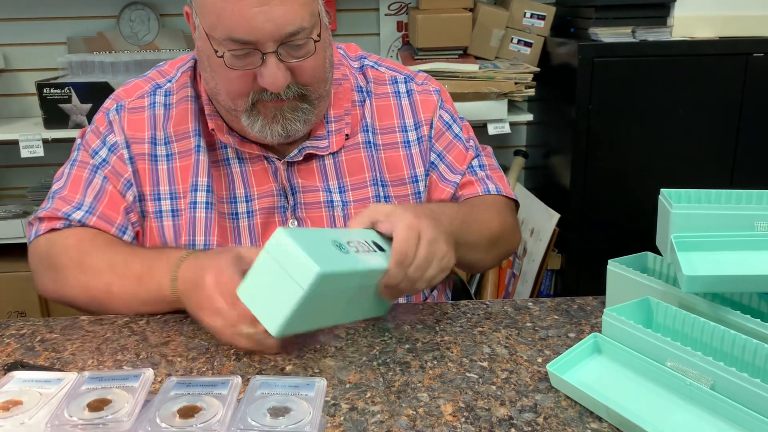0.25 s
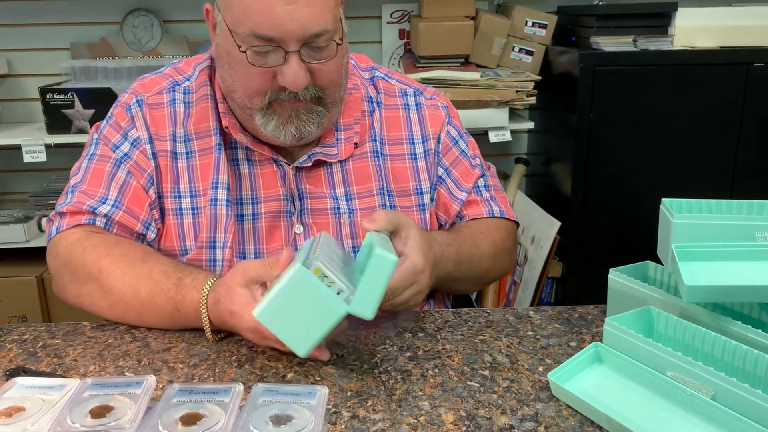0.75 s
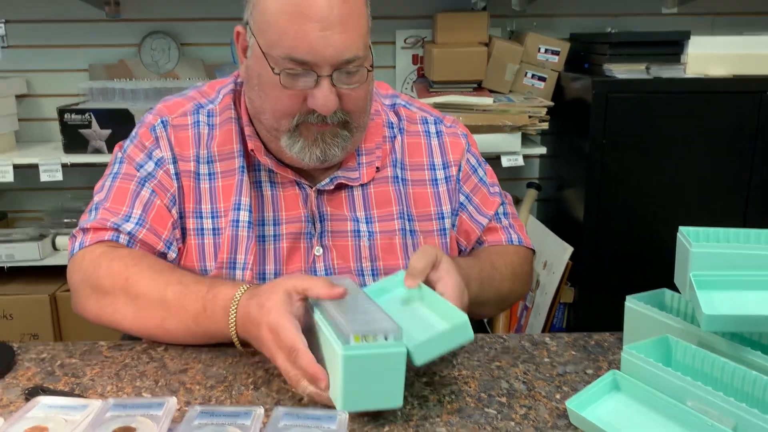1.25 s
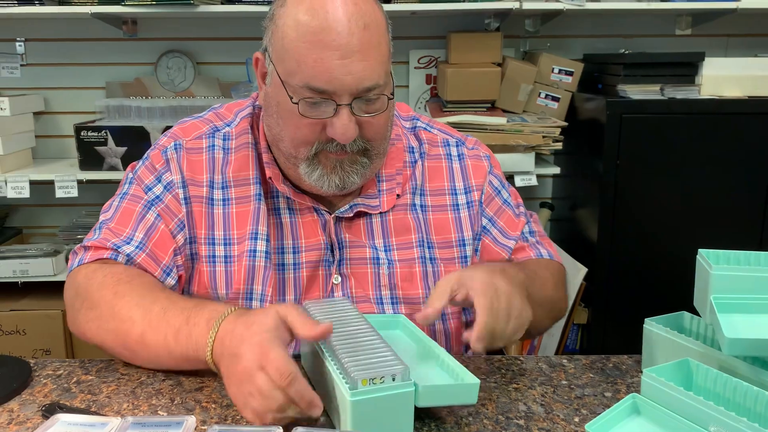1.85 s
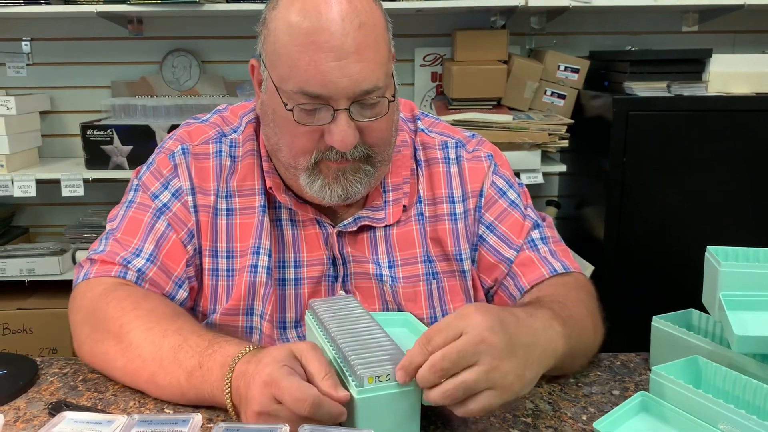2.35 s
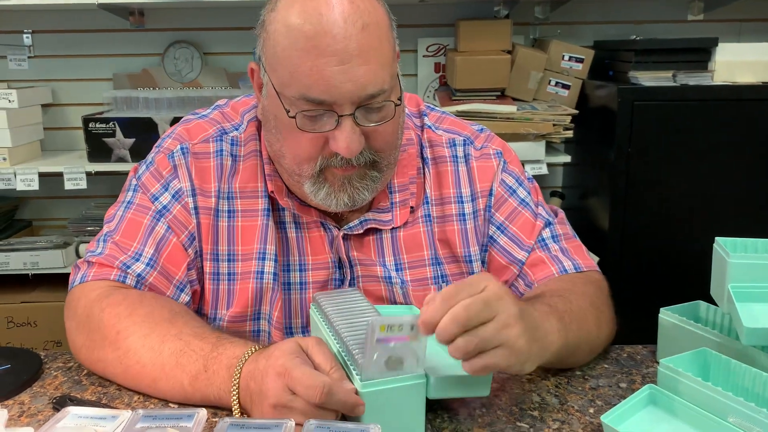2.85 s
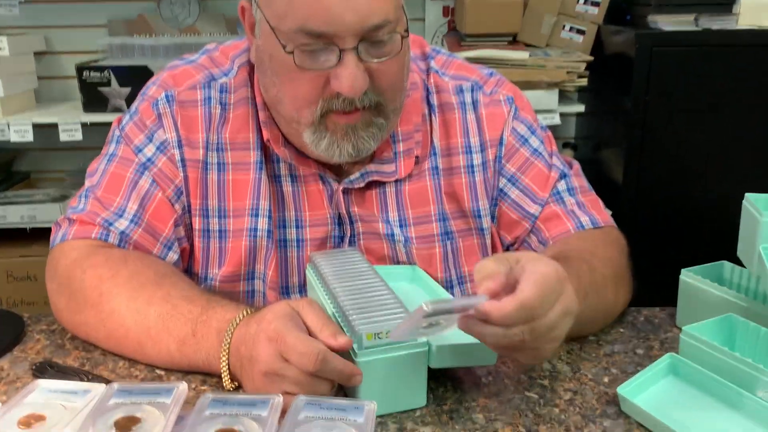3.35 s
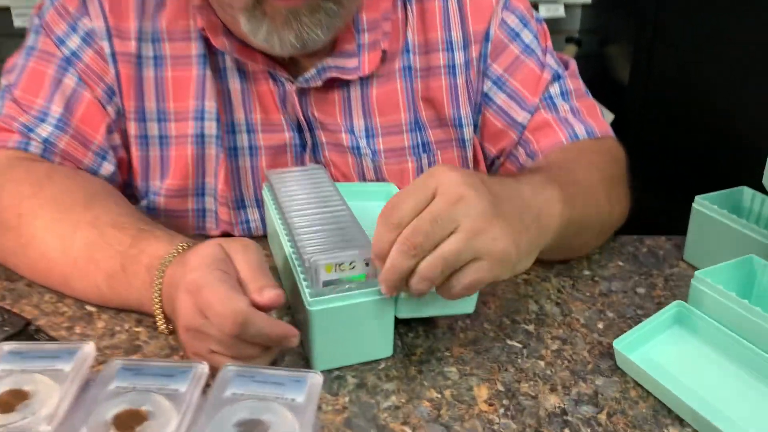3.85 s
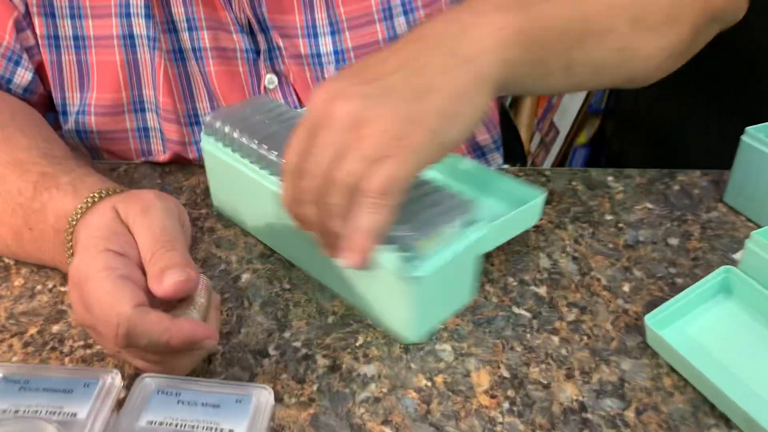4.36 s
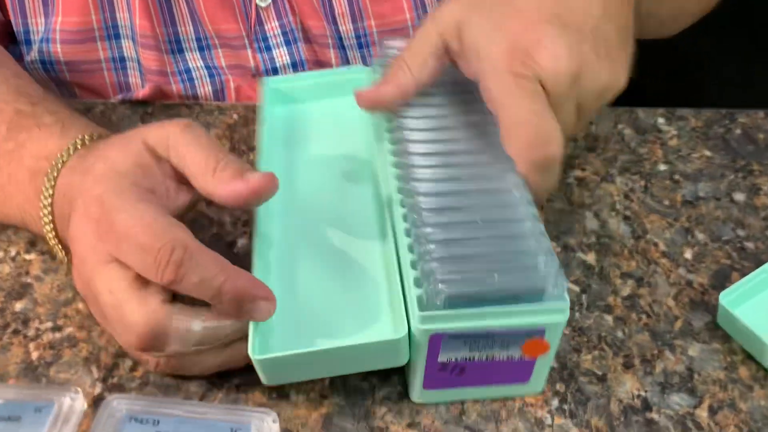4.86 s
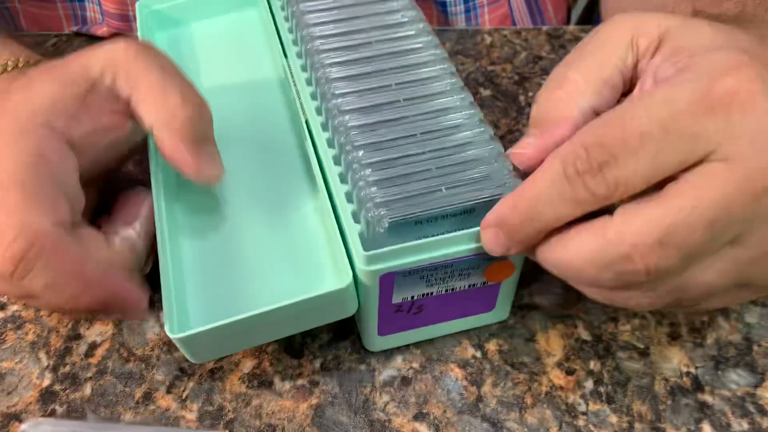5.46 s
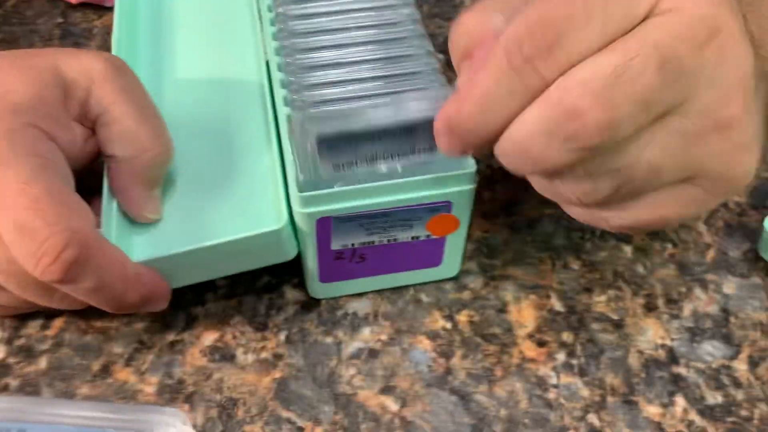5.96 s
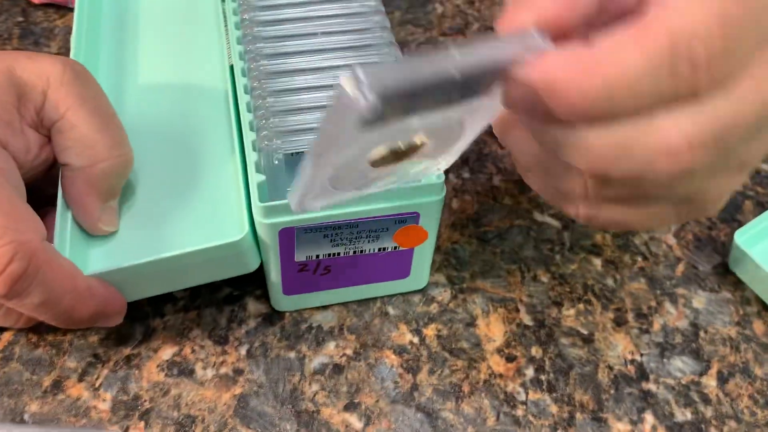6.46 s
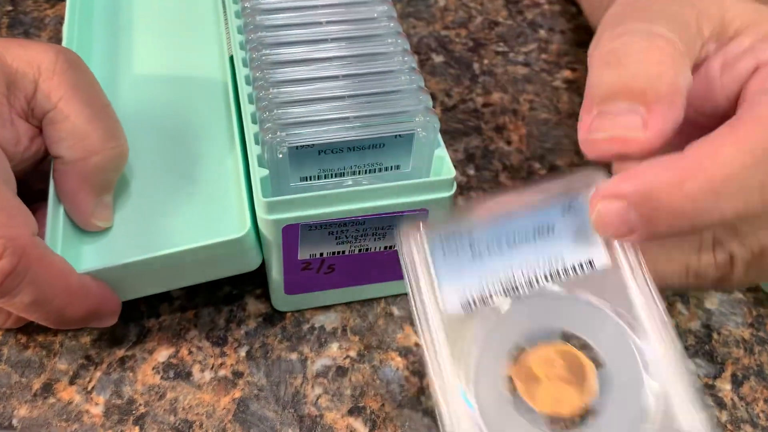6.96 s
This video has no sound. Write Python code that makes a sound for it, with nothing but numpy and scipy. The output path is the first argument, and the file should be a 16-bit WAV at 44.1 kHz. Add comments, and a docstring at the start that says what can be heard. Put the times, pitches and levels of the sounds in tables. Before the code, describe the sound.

In a small quiet shop, a hollow plastic box ticks open and knocks onto a stone counter, loudest at the set-down. After faint fingering, rigid slabs snap sharply back into their slots. The loaded box then scrapes and rattles round with a brief squeak, and slabs click and rasp as one is drawn out. A hand-held camera moves closer, with soft handling rumble.

```python
"""Coin slabs in a hard plastic box

A hard plastic storage box is unlatched, swung open and set down on a stone counter in a small shop.
Slabs click in its slots as they are lifted and dropped back; the box is dragged round and another is drawn out.
Knocks, clicks and ticks are short noisy contacts with ringing modes; rubs and drones are coloured, uneven noise.
Echoes surround them, with still air and handling rumble beneath, as a hand-held camera with two ports moves in."""
import sys
import numpy as np
from scipy import signal
from scipy.fft import rfft, irfft, next_fast_len
from scipy.io import wavfile
from scipy.ndimage import uniform_filter1d

SR = 44100
rng = np.random.default_rng(int(sys.argv[2]) if len(sys.argv) > 2 else 0)


def bounce(signal):
    """Save signal as a 16-bit WAV file at the path given by the first command-line argument."""
    frames = np.transpose(np.atleast_2d(signal))
    limited = np.clip(frames, -1, 1)
    pcm = np.round(limited * 32767).astype(np.int16)
    wavfile.write(sys.argv[1], SR, pcm)


N = 317520

# Still air of the shop. Each row: frequency in Hz, relative level in dB per Hz.
AIR_COLOUR = [(18, -32.5), (30, 0.5), (134, -7.5), (336, -33), (526, -18.5), (1160, -27), (3580, -32.5),
              (7470, -41), (8520, -50), (11100, -32), (16000, -45.5)]
# Deep rumble and dull rustle of the moving camera. Each row: frequency in Hz, relative level in dB per Hz.
RUMBLE_COLOUR = [(15, -21.5), (35, -4), (64, 6), (130, -4.5), (220, -7), (400, -29.5), (1500, -44),
                 (8000, -63.5)]
RUSTLE_COLOUR = [(60, -29.5), (180, -5), (260, -1.5), (420, -3.5), (600, -22.5), (1100, -20.5),
                 (2000, -24.5), (8000, -57.5)]
# Moving hands and camera. Each row: time in seconds, rumble and rustle in dB before the trims in handling().
HANDLING = [(0.0, -71, -74), (0.18, -84, -80.5), (0.52, -79, -97), (0.98, -56.5, -63.5), (1.38, -62, -76.5),
            (1.68, -56.5, -64.5), (2.15, -67.5, -90), (2.95, -74, -85), (3.21, -63, -73),
            (4.53, -61.5, -69.5), (5.05, -59.5, -77), (6.28, -55, -51.5), (7.2, -60, -64.5)]
# Skin on a slab, plastic rub, fine hiss, and drone of the loaded box dragged and pressed on the stone.
# Each row: frequency in Hz, relative level in dB per Hz.
SKIN_COLOUR = [(300, -25), (620, -14), (750, -3), (930, -5), (1070, 1), (1250, -8), (1550, -13), (1720, -9),
               (2800, -22), (3650, -13), (4400, -16), (5400, -27), (6300, -21), (9000, -45), (16000, -50)]
RUB_COLOUR = [(40, -15.5), (160, -5), (300, -2), (450, 7), (560, 1.5), (800, 8), (1100, 2), (1600, 0.5),
              (2600, -7), (5500, -6), (8000, -21), (16000, -35)]
HISS_COLOUR = [(1000, -8), (3000, -9), (6000, 4), (8500, 3.5), (11000, 5), (13500, 6.5), (16000, -4)]
DRAG_COLOUR = [(40, -25.5), (100, -5), (150, 1.5), (220, 2), (300, -12), (420, -8.5), (700, -37.5),
               (4000, -71.5)]
# Fingers slide over a slab or turn it. Each row: start in seconds, length in seconds, level in dB.
TURNINGS = [(2.2, .38, -72), (3.0, .39, -67), (6.39, .56, -63), (6.97, .17, -74)]
# Sliding strokes: latch, lid, grip, drag and slabs drawn from their slots. Each row: start in seconds,
# length before the release in seconds, plastic rub in dB, fine hiss in dB, drone in dB before its trim.
STROKES = [(-0.02, 0.022, -38.5, -46.5, -57), (0.158, 0.049, -67, -83, -85), (0.452, 0.03, -48.5, -65, -68),
           (0.634, 0.028, -56, -69, -75), (0.373, 0.1, -72.5, -69, -71), (0.602, 0.35, -73, -66.5, -70),
           (0.828, 0.21, -45.5, -66, -54), (1.06, 0.31, -70.5, -69, -69), (1.642, 0.095, -41.5, -71.5, -45),
           (1.787, 0.091, -61, -72.5, -61.5), (2.173, 0.098, -74, -91, -85), (2.172, 0.83, -77, -78.5, -96),
           (3.522, 0.65, -59, -90, -55), (4.14, 0.31, -48, -74, -50.5), (4.254, 0.093, -52.5, -46.5, -59),
           (4.338, 0.31, -44, -40, -55), (4.625, 0.19, -46, -48, -45), (4.823, 0.19, -51, -46.5, -53.5),
           (5.13, 0.32, -45, -54.5, -56), (5.448, 0.24, -45.5, -59.5, -45),
           (5.71, 0.26, -49.5, -55.5, -47.5), (5.96, 0.033, -56, -63, -64),
           (6.073, 0.31, -49.5, -62.5, -69), (6.911, 0.038, -59.5, -61.5, -79.5)]
# The box squeaks as it stops turning. Each row: time in seconds, centre pitch in Hz, level in dB.
SQUEAK = [(5.2, 585, -64), (5.25, 562, -46), (5.31, 552, -43), (5.37, 556, -57)]
# Thin, dry ticks of latch and fingernails. Each row: time in seconds, level in dB.
NIPS = [(.178, -71), (.468, -65), (.4845, -47), (.509, -54), (.526, -66), (.541, -64), (.703, -61),
        (2.213, -56.5), (2.381, -49.5), (3.067, -73), (5.216, -41), (6.945, -61)]
# Knocks of box and lid. Each row: time in seconds, overall level in dB, then thump, hollow ring and tick
# in dB relative to it (before the trims in knock()), rattle decay in ms.
KNOCKS = [(0.0034, -34.5, -13.5, 0, -12, 2.7), (0.028, -47, -28, 2.5, -13, 5), (0.062, -56, -24, 3, -28, 4),
          (0.244, -62, -9, 2.5, -26, 5), (0.4, -63, -8, -1, -20, 7), (0.4815, -45, -9, -1.5, -20, 3.2),
          (0.609, -56.5, -16, -2, -27, 4.6), (0.625, -57.5, -19, -12, -2, 4.9),
          (0.6815, -45.5, -19, -2, -19, 13), (0.68, -50.5, -20, 5, -23, 23),
          (0.72, -61.5, -18, -11, 2, 1.8), (0.8655, -21.5, -3.5, -8.5, -16, 4.1),
          (0.8759, -26.5, -8.5, -7.5, -18, 6.6), (0.89, -37.5, -20, -9.5, -18, 3),
          (0.9182, -32, -1.5, -9, -6, 3), (0.952, -38.5, -2, -6.5, -29, 6),
          (0.9872, -13.5, -12, -10.5, -19, 4.3), (0.9946, -21.5, -17, -7, -18.5, 5.4),
          (1.0023, -17.5, -14, -15, -16, 13), (1.019, -31, -8.5, -6.5, -9, 8),
          (1.1538, -33.5, -4.5, -5.5, -16.5, 11), (1.201, -46, -13, -6.5, -33, 6),
          (1.4478, -34, -28, -7, -25, 4.7), (1.5069, -19, -26, -9.5, -19, 7),
          (1.519, -19.5, -18, -11, -14.5, 5.7), (1.57, -35.5, -17, -9.5, -17, 12),
          (1.6254, -27, -31.5, -10.5, -14, 5.6), (1.634, -15, -32, -11, -18, 7.7),
          (1.6443, -4.5, -15, -13.5, -13.5, 5.7), (1.6578, -19.5, -22, -7, -9.5, 11),
          (1.6752, -20.5, -17, -11.5, -12.5, 5.2), (1.688, -23, -13, -15.5, -21, 5.4),
          (1.7265, -37.5, -20, -12.5, -23, 6), (1.75, -35.5, -22.5, -7.5, -28, 3.4),
          (1.7863, -36, -16, -6.5, -26, 3), (1.8308, -32.5, -27, -9.5, -10.5, 3.7),
          (1.874, -47, -23.5, -0.5, -17.5, 3.1), (1.893, -56, -21, -2, -20.5, 4.8),
          (4.272, -36.5, -4.5, -2, -14, 4), (4.357, -35, -8.5, -3.5, -9, 6.8),
          (4.371, -39.5, -4, 1.5, -15, 5.7), (4.4353, -32.5, -26, -1.5, -2, 2.6),
          (4.4721, -35, -14, 1, -2, 10), (4.5522, -33, -25, -11, -6.5, 5),
          (4.605, -33.5, -18, -6.5, -14, 7), (4.6284, -25, -13.5, -7.5, -20, 9.4),
          (4.654, -33, -7.5, -10, -17, 6), (4.6914, -36, -24, -9, -14, 6), (4.718, -39.5, -4, -2, -6, 5.8),
          (4.757, -30.5, -21, -4, -5.5, 6.7), (4.7742, -25.5, -14, -4.5, -10.5, 12),
          (4.8638, -42, -16, -8, -11, 4.7), (4.9073, -39, -35.5, -7, 0, 5.4),
          (4.951, -38.5, -16, -9, -21, 5), (5.2293, -29.5, -18.5, -7.5, -8, 2.8),
          (5.2887, -36.5, -14.5, -20, -20, 4)]
# Jolts that set the row chattering. Each row: start in seconds, length in seconds, mean level in dB,
# tick in dB relative to it (before the trim in knock()).
JOLTS = [(4.629, .03, -32.5, -12), (5.049, .022, -32, -7.5), (5.117, .035, -29.5, -8.5),
         (5.167, .038, -31.5, -9)]
# Modes of the box. Each row: nominal frequency in Hz, mean weight in dB, 60 dB decay in seconds.
BOX_MODES = [(410, -6, .1), (505, -12, .24), (617, -7, .14), (868, -5, .12), (1000, -10, .22),
             (1255, -2, .13), (1319, 0, .12), (1475, -2, .09), (1623, 2, .12), (1788, 0, .12),
             (1895, -4, .1), (2560, -7, .09), (3661, -6, .09), (4660, -3, .08)]
# Noise of a contact on the box and on a slab. Each row: frequency in Hz, relative level in dB per Hz.
BOX_COLOUR = [(40, -14.5), (90, 4), (150, -4), (300, -6.5), (400, -8.5), (540, -4), (1000, -8),
              (1650, -3.5), (2300, -3), (4500, -13), (7000, -21), (11000, -24), (16000, -32)]
SLAB_COLOUR = [(40, 10.5), (150, -10.5), (330, 0.5), (550, -25.5), (720, 0.5), (1000, -2), (1600, 5.5),
               (2300, 2.5), (4500, -6.5), (6800, -15.5), (8500, -16), (11500, -25), (16000, -30.5)]
# Slabs striking slots and neighbours. Each row: time in seconds, overall level in dB, then ring, tick and
# ping in dB relative to it (before the trims in click()), ring, wall and edge ping in Hz, rattle decay in ms.
SLABS = [(2.1736, -43, -3, -25, -14, 810, 1210, 4430, 4.7),
         (2.1896, -43, -5.5, -19.5, -17.5, 798, 1154, 2670, 3),
         (2.2333, -50, -3.5, -14.5, -11, 842, 1450, 3580, 3),
         (2.252, -46.5, -16, -36.5, -12.5, 865, 1480, 3040, 2.4),
         (2.38, -37.5, -14.5, -10, -13.5, 913, 1420, 3294, 3),
         (2.4992, -36.5, -15, -5.5, -6.5, 897, 1285, 4040, 8.9),
         (2.5341, -34.5, -22, -12.5, -6, 885, 1360, 3100, 2.8),
         (2.548, -42.5, -10.5, -14, -14.5, 804, 1240, 3348, 3),
         (2.648, -36.5, -18, -22.5, -19, 820, 1590, 3036, 3),
         (2.658, -39, -1.5, -30, -20, 856, 1550, 3040, 4.6),
         (2.691, -50, -1.5, -32, -17, 925, 1140, 3030, 3),
         (2.7179, -38, -7.5, -28, -6, 840, 1615, 3260, 3.3),
         (2.7764, -49.5, -8.5, -12.5, -1, 830, 1650, 3060, 2.5),
         (2.8476, -54, 4.5, -12.5, -9, 796, 1565, 3100, 5.7),
         (3.0088, -54.5, -16, -21, -25, 792, 1600, 3010, 1.94),
         (3.511, -24, -2, -21.5, -17, 815, 1300, 3160, 6.2),
         (3.5329, -24.5, -5.5, -26, -27, 687, 1310, 2720, 2.8),
         (3.587, -29, -1, -22.5, -24, 836, 1660, 3111, 4.6),
         (3.64, -27.5, 1, -9, -13, 834, 1540, 4450, 3.3),
         (3.7072, -35, -1.5, -32, -12, 850, 1137, 4900, 3.4),
         (3.7776, -26, -4.5, -15.5, -18.5, 800, 1160, 2460, 11),
         (3.8176, -28, 1.5, -10, -8, 805, 1580, 6700, 3.4),
         (3.823, -13.5, -7.5, -4.5, -4.5, 817, 1550, 7170, 2.2),
         (3.8583, -25, -7.5, -17, -15, 865, 1804, 3530, 6),
         (3.9387, -9.5, -7.5, -10, -12, 842, 1350, 3160, 5.3),
         (3.944, -16, -7, -7.5, -14, 850, 1660, 4600, 3.3), (3.9806, -31, -0.5, -9, -8, 800, 1350, 3100, 8),
         (4.1, -33, -7, -2, -22, 790, 1410, 3460, 2), (4.146, -42, -2, -18, -7, 1015, 1653, 3080, 3),
         (4.1861, -39, 1.5, -29, -14, 840, 1220, 2650, 10),
         (4.2071, -37.5, 5.5, -20, -6, 860, 1156, 2770, 2.2),
         (4.2559, -31.5, -5.5, -15, -7, 887, 1080, 2520, 9.8),
         (4.2905, -31.5, 0, -10, -13, 880, 1205, 4820, 4.7), (4.3868, -36, 0, -26, -21, 860, 2110, 4440, 4),
         (5.016, -34, -1, -18, -15, 780, 1260, 4447, 4),
         (5.371, -19.5, -12.5, 0, -12.5, 1020, 1700, 6642, 2.66),
         (5.42, -20, -16, -10.5, -2.5, 1100, 1314, 3040, 3.2),
         (5.5059, -18.5, -14.5, -9.5, -23.5, 1036, 1580, 6550, 3),
         (5.522, -32.5, -4.5, -4, -15, 1020, 1590, 4600, 2.1),
         (5.557, -41, -12, -1.5, -6, 950, 1320, 3080, 3),
         (5.611, -31, -10.5, -12, -10, 1084, 1418, 3080, 3.4),
         (5.6398, -29, -3.5, -7, -13.5, 690, 1160, 2950, 2.4),
         (5.669, -32, -9, -1, -6.5, 951, 1280, 3060, 3),
         (5.708, -42.5, -12, -6.5, -22.5, 800, 1259, 3100, 2.7),
         (5.7397, -38.5, -8, -4.5, -5, 740, 1270, 3000, 3.4),
         (5.8332, -33.5, -7, -18, -20, 1060, 1500, 5264, 6.6),
         (5.8752, -30.5, -22, -30, -10.5, 1058, 1706, 3070, 3.7),
         (5.911, -42, -5, -26, -31, 1040, 1630, 3070, 3),
         (5.965, -30.5, -14, -6.5, -5.5, 767, 1647, 5980, 3),
         (5.976, -30.5, -14, -6, -20, 1100, 1560, 4000, 3),
         (6.0597, -29.5, -3.5, -20, -11.5, 780, 1914, 4930, 10),
         (6.098, -48, 8.5, -27, -20.5, 810, 1210, 4500, 4),
         (6.173, -36.5, -3, -18, -15.5, 810, 1590, 4230, 4.5),
         (6.1814, -20.5, -4, -13, -13.5, 759, 1620, 4170, 4),
         (6.211, -39.5, 4, -14, -10, 746, 1690, 4426, 2.4), (6.229, -44.5, 2, -2, -9, 780, 1354, 5800, 1.8),
         (6.266, -35.5, -4.5, -18, -14, 760, 1754, 5361, 4),
         (6.3096, -25.5, 2, -4, -5.5, 822, 1256, 4570, 2.7),
         (6.365, -42.5, 4.5, -5, -10, 796, 1120, 4850, 3.3),
         (6.636, -44, 2, -23.5, -21.5, 720, 1730, 2454, 7)]
# Modes of a slab seated in its slot. Each row: nominal frequency in Hz, mean weight in dB, 60 dB decay in seconds.
SLAB_MODES = [(790, 2, .035), (1050, -1, .028), (1200, -2, .03), (1340, -3, .028), (1620, -1, .032),
              (1830, -1, .032), (2120, -5, .025), (3070, -10, .028), (3970, -10, .02), (4420, -9, .02),
              (5810, -10, .018)]
# A slab rasps along the ribs of its slot. Each row: start in seconds, length in seconds, level in dB.
RASPS = [(3.814, .19, -46), (5.974, .092, -35), (6.076, 0.035, -63), (6.184, .14, -49)]
# Loose slabs jostle under the hands. Each row: start in seconds, length in seconds, contacts per second,
# level of a contact in dB before the random spread.
JOSTLES = [(1.05, .18, 28, -53.5), (1.72, .2, 30, -53), (2.197, .42, 30, -70), (2.66, .2, 30, -66.5),
           (3.529, 0.33, 30, -50), (4.231, .22, 50, -45.5), (4.461, 0.58, 45, -43), (5.231, .13, 40, -55.5),
           (5.471, .26, 35, -45), (5.741, .22, 28, -49), (6.101, .25, 36, -55)]
# Room decay. Each row: frequency in Hz, 60 dB decay in seconds.
ROOM = [(100, 0.18), (400, 0.16), (900, 0.28), (2000, 0.16), (5000, 0.16), (11000, 0.012), (16000, 0.0097)]
# Likeness of echoes and steady noise at the two ports. Each row: frequency in Hz, likeness from 0 to 1.
LIKENESS = [(30, .3), (70, .6), (140, .97), (300, .9), (500, .6), (800, .2), (3000, .2), (6000, .3),
            (8000, .8)]
# Phase lead of the left port. Each row: frequency in Hz, lead in radians.
PORT_PHASE = [(0, 0), (90, 0), (300, 3.1), (560, 6.4), (740, 10.1), (1050, 14.8), (1300, 13.3),
              (1800, 14.1), (2400, 16), (4200, 14.3), (5600, 16.2), (6400, 18.7), (7900, 15.9),
              (9400, 15.5), (10000, 12.9), (11700, 12.4), (12700, 9.6), (14300, 9.1), (15100, 6.4)]
# Left-right balance before and after the camera moves in. Each row: frequency in Hz, left over right in dB.
FAR_BALANCE = [(60, 4.5), (130, -0.5), (290, 1.5), (640, -1), (1410, -1.0), (3100, 3.5), (6820, -2),
               (15000, 1)]
NEAR_BALANCE = [(350, 1), (550, -7), (850, -7.5), (1150, 1.5), (1650, -10), (2900, 8), (3700, -3.5),
                (5200, -15), (7000, 0.5)]
# Start and end of the move, in seconds.
MOVE_IN_S = (2.9, 3.5)

STROKE_ATTACK_S, STROKE_RELEASE_S, STROKE_SAG_DB = 0.045, 0.025, -1.5
CATCHES_PER_S, CATCH_KINDS, CATCH_DB = 55, 8, -4
COUNTER_ECHO_S = 0.002  # middle lag of the reflection off the counter
CHATTER_PER_S, CHATTER_SPREAD_DB = 190, 3
RASP_SLIPS_PER_S, RASP_SPREAD_DB = 360, 4
JOSTLE_SPREAD_DB = 3
BAND_LIMIT_HZ = 16500

LEAD = .012  # seconds of grazing room ahead of each contact
T = np.arange(8192) / SR - LEAD
AFTER = np.maximum(T, 0)


def amp(db):
    """Turns decibels into gain."""
    return 10 ** (np.asarray(db) / 20)


def unit(x):
    """Scales to rms 1."""
    return x / np.sqrt(np.mean(x ** 2) + 1e-20)


def burst(x):
    """Scales a short sound to the energy of 15 ms at rms 1."""
    return x / np.sqrt(np.sum(x ** 2) / (.015 * SR) + 1e-20)


def read(points, hz):
    """Reads a table on a log-frequency axis."""
    f, value = np.transpose(points)
    return np.interp(np.log(hz + 1), np.log(f + 1), value)


def follow(rows):
    """Draws the columns of a timed table as smooth curves, sample by sample."""
    s, *columns = np.transpose(rows)
    return [np.interp(np.arange(N) / SR, s, c) for c in columns]


def during(rows):
    """One while a timed table runs, zero outside it."""
    return np.interp(np.arange(N) / SR, [rows[0][0], rows[-1][0]], [1, 1], left=0, right=0)


def add(mix, s, sound):
    """Adds a sound into the mix at time s, cropped at both ends."""
    start = round(s * SR)
    sound = sound[max(-start, 0):]
    part = mix[max(start, 0):][:len(sound)]
    part += sound[:len(part)]


def colour(x, points):
    """Shapes a sound to a spectrum with a causal, minimum-phase filter."""
    size = len(x)
    log_gain = np.log(amp(read(points, abs(np.fft.fftfreq(size, 1 / SR)))))
    response = np.exp(signal.hilbert(log_gain).conj())
    return irfft(rfft(x) * response[:size // 2 + 1], size)


def band(x, lo_hz, hi_hz):
    """Causal band-pass."""
    return signal.sosfilt(signal.butter(3, [lo_hz, hi_hz], "band", fs=SR, output="sos"), x)


def wander(rate_hz):
    """A random curve of rms 1 that moves no faster than the given rate."""
    spectrum = rfft(rng.standard_normal(N))
    return unit(irfft(spectrum * (np.fft.rfftfreq(N, 1 / SR) < rate_hz), N))


def pair(x):
    """Makes two unrelated signals partly alike, as two close ports hear a diffuse sound."""
    size = x.shape[1]
    same = read(LIKENESS, np.fft.rfftfreq(size, 1 / SR))
    a, b = rfft(x)
    return irfft(np.array([a, same * a + np.sqrt(1 - same ** 2) * b]), size)


def diffuse(points):
    """Steady coloured noise at both ports."""
    return pair(np.array([unit(colour(rng.standard_normal(N), points)) for _ in range(2)]))


def air():
    """Still shop air: a faint, steady diffuse noise."""
    return amp(-67) * diffuse(AIR_COLOUR)


def handling():
    """Deep rumble and a dull rustle come through the camera body as it moves."""
    rumble, rustle = follow(HANDLING)
    return amp(rumble + 2) * diffuse(RUMBLE_COLOUR) + amp(rustle + 1) * diffuse(RUSTLE_COLOUR)


def mode(hz, t60):
    """A sine that starts at the contact and dies away."""
    return np.sin(2 * np.pi * hz * AFTER) * np.exp(-np.log(1000) * AFTER / t60)


def swelling(hz, t60, rise_s):
    """A mode that builds up while the contact lasts."""
    return burst(mode(hz, t60) * (1 - np.exp(-AFTER / rise_s)))


def flex(hz, t60, rise_s):
    """The slow bending of the whole box that follows a blow."""
    return burst(mode(hz, t60) * (1 - np.exp(-AFTER / rise_s)) ** 2)


def bending_wave(from_hz, to_hz, glide_s, t60):
    """A blow spreads through the walls, quick ripples first: the thump slides down into the lowest mode."""
    turns = to_hz * AFTER + (from_hz - to_hz) * glide_s * (1 - np.exp(-AFTER / glide_s))
    envelope = (1 - np.exp(-AFTER / 0.004)) * np.exp(-np.log(1000) * AFTER / t60)
    return burst(np.sin(2 * np.pi * turns) * envelope)


def ringing(modes):
    """Where the blow lands weights the modes at random, and the grip detunes them by up to 1 %."""
    ring = np.zeros(len(T))
    for hz, db, t60 in modes:
        ring += amp(db) * rng.standard_normal() * mode(hz * rng.uniform(.99, 1.01), t60)
    return burst(ring)


def contact(rattle_ms, snap_db, graze_db, linger_db, linger_s, clump_db):
    """Edges graze, snap together, and chatter to rest in clumps of tiny impacts."""
    graze = amp(graze_db) * np.exp(np.minimum(T, 0) / 0.003) * (T < 0)
    blow = amp(snap_db) * np.exp(-AFTER / 0.0012) + np.exp(-AFTER / (rattle_ms / 1000))
    linger = amp(linger_db) * np.exp(-AFTER / linger_s)
    unevenness = unit(uniform_filter1d(rng.standard_normal(len(T)), size=50))
    clumps = amp(clump_db * unevenness * (-1 - np.exp(-AFTER / 0.024)))  # roughest at the blow
    return (graze + (blow + linger) * (T >= 0)) * clumps * rng.standard_normal(len(T))


def edge_tick(x, rest, tick_s):
    """The treble of a contact, strongest in its first instant."""
    return burst(band(x, 4600, 19000) * (rest + np.exp(-abs(T) / tick_s)))


def slip(grit_db):
    """One small contact: a speck of grit and the ring of a slab."""
    speck = rng.standard_normal(len(T)) * np.exp(-AFTER / .0008) * (T >= 0)
    return ringing(SLAB_MODES) + amp(grit_db) * burst(band(speck, 700, 7500))


def stroke(start, length):
    """Pressure of one stroke: attack, sagging hold, release."""
    t = np.arange(N) / SR - start
    attack = np.clip(t / STROKE_ATTACK_S, 0, 1)
    hold = amp(STROKE_SAG_DB * np.clip(t / length, 0, 1))
    return attack * hold * np.exp(-np.maximum(t - length, 0) / STROKE_RELEASE_S)


def turning():
    """Skin slides softly over the loose slab: coloured noise under an uneven pressure."""
    pressure = sum(amp(db) * stroke(start, length) for start, length, db in TURNINGS)
    skin = unit(colour(rng.standard_normal(N), SKIN_COLOUR))
    return pressure * amp(1.5 * wander(rate_hz=9)) * skin


def friction(points, grains_per_s, grain_db, smooth_db, judder_db):
    """Tiny slips of uneven size over a smooth hiss, under a juddering pressure."""
    sizes = amp(grain_db * np.minimum(rng.exponential(1, N), 5))
    slips = sizes * rng.choice([-1, 1], N) * (rng.random(N) < grains_per_s / SR)
    drive = unit(slips) + amp(smooth_db) * rng.standard_normal(N)
    return unit(colour(drive * amp(judder_db * wander(rate_hz=18)), points))


def catches():
    """A sliding edge catches on grit or ribs at chance moments: short scuffs that ring the slabs."""
    out = np.zeros(N)
    for _ in range(CATCH_KINDS):
        scuff = contact(4, snap_db=-6, graze_db=-6, linger_db=-20, linger_s=.01, clump_db=3)
        scuff = burst(band(colour(scuff, SLAB_COLOUR), 600, 12000)) + amp(-7) * ringing(SLAB_MODES)
        moments = rng.random(N) < CATCHES_PER_S / CATCH_KINDS / SR
        out += signal.oaconvolve(rng.uniform(.4, 1, N) * moments, scuff)[:N]
    return unit(out)


def shifting(x):
    """The points of contact keep changing, so one resonance after another stands out of a scrape."""
    z = signal.stft(x, nperseg=512, noverlap=384)[2]
    patches = uniform_filter1d(rng.standard_normal(z.shape), size=5, axis=0)  # smooth in pitch
    patches = unit(uniform_filter1d(patches, size=6, axis=1))  # and in time
    z = z * amp(4 * np.clip(patches, -2, 2))
    return unit(signal.istft(z, nperseg=512, noverlap=384)[1][:N])


def swept(x):
    """Adds a reflection off the counter whose path lengthens and shortens at random."""
    delay = SR * COUNTER_ECHO_S * amp(2 * wander(rate_hz=2.5))
    at = np.arange(N)
    return unit(x + 0.62 * np.interp(at - delay, at, x))


def drag():
    """The loaded box drones unevenly as it sticks and slips: low noise with a wandering level."""
    return unit(colour(rng.standard_normal(N) * amp(0.5 * wander(rate_hz=6.8)), DRAG_COLOUR))


def sliding():
    """Plastic rubs on stone, plastic and skin; the slips keep the low bending mode of the box going."""
    rub, hiss, drone = sum(np.outer(amp(levels), stroke(start, length)) for start, length, *levels in STROKES)
    scrape = friction(RUB_COLOUR, grains_per_s=600, grain_db=3.3, smooth_db=-7, judder_db=3.3)
    scrape += amp(CATCH_DB) * catches()
    fizz = friction(HISS_COLOUR, grains_per_s=1400, grain_db=3.5, smooth_db=-2, judder_db=1.6)
    return rub * swept(shifting(scrape)) + hiss * fizz + amp(-4) * drone * drag()


def squeak():
    """A short, nearly pure stick-slip tone with a slightly unsteady pitch."""
    hz, db = follow(SQUEAK)
    phase = 2 * np.pi * np.cumsum(hz * (1 + .008 * wander(rate_hz=60))) / SR
    return during(SQUEAK) * amp(db) * np.sin(phase)


def nips():
    """Tiny snaps of latch and fingernails: only the treble of a very short contact."""
    out = np.zeros(N)
    for s, db in NIPS:
        snap = contact(1.2, snap_db=0, graze_db=-20, linger_db=-26, linger_s=.008, clump_db=2)
        add(out, s - LEAD, amp(db) * burst(band(snap, 8200, 16000)))
    return out


def knock(thump_db, hollow_db, tick_db, rattle_ms):
    """A knock flexes the thin walls (thump), rings their modes and ticks at the point of contact."""
    crack = contact(rattle_ms, snap_db=-0.5, graze_db=-8.5, linger_db=-14.0, linger_s=0.024, clump_db=4.5)
    shell = burst(colour(crack, BOX_COLOUR)) + amp(-8) * ringing(BOX_MODES)
    walls = amp(-2) * bending_wave(from_hz=540, to_hz=175, glide_s=.005, t60=.045)
    walls += amp(-3) * burst(band(shell, 190, 450))
    sound = amp(thump_db - 3) * (amp(-3) * flex(hz=146, t60=.045, rise_s=.006) + walls)
    sound += amp(hollow_db - 1.5) * burst(band(shell, 652, 1100))
    sound += amp(-16) * burst(band(shell, 380, 767))  # panel
    sound += amp(-8) * burst(band(shell, 1100, 4200))  # clack
    return sound + amp(tick_db - 1) * edge_tick(shell, rest=0.95, tick_s=0.0023)


def box():
    """Knocks of the box and its lid, each a fresh contact."""
    out = np.zeros(N)
    for s, db, *timbre in KNOCKS:
        add(out, s - LEAD, amp(db) * knock(*timbre))
    return out


def chatter():
    """A jolt runs along the row: one slab after another knocks against the box, at uneven intervals."""
    out = np.zeros(N)
    for start, length, db, tick_db in JOLTS:
        count = round(CHATTER_PER_S * length)
        for k in range(count):
            s = start + length * (k + rng.uniform(-.4, .4) * (k > 0)) / count  # the first is on time
            strength = amp(db + CHATTER_SPREAD_DB * rng.standard_normal())
            add(out, s - LEAD, strength * knock(thump_db=-22, hollow_db=-10, tick_db=tick_db, rattle_ms=5))
    return out


def jostling():
    """Light contacts at chance moments, each ringing a slab in its own way."""
    out = np.zeros(N)
    for start, length, per_s, db in JOSTLES:
        count = round(per_s * length)
        for k in range(count):
            s = start + length * (k + rng.random()) / count
            size = amp(db + JOSTLE_SPREAD_DB * np.clip(rng.standard_normal(), -2, 1))
            add(out, s - LEAD, size * slip(grit_db=-5))
    return out


def rasping():
    """A tight slab sticks and slips hundreds of times a second; every slip rings it anew."""
    out = np.zeros(N)
    for start, length, db in RASPS:
        count = int(RASP_SLIPS_PER_S * length)
        slips = np.zeros(N)
        for k in range(count):
            s = start + length * (k + rng.random()) / count
            add(slips, s - LEAD, amp(RASP_SPREAD_DB * rng.standard_normal()) * slip(grit_db=-4))
        out += amp(db) * slips / np.sqrt(np.sum(slips ** 2) / (length * SR))
    return out


def click(ring_db, tick_db, ping_db, ring_hz, wall_hz, ping_hz, rattle_ms):
    """A slab bends in one low mode, shakes the wall it meets and pings at its edge; the box sings on faintly."""
    crack = contact(rattle_ms, snap_db=-4, graze_db=-3, linger_db=-16.5, linger_s=0.015, clump_db=2.5)
    crack = colour(crack, SLAB_COLOUR)
    grip = rng.uniform(.7, 1.2)  # shortens or lengthens the ring
    bend = swelling(ring_hz, t60=.028 * grip, rise_s=.0012) + amp(-2) * burst(band(crack, 620, 1150))
    cavity = amp(-18) * rng.choice([-1, 1]) * swelling(hz=826, t60=0.16, rise_s=.015)
    thump = flex(hz=137, t60=0.04, rise_s=0.0053) + burst(band(crack, 290, 380))
    sound = amp(ring_db - 1) * burst(bend + cavity)
    sound += amp(-11) * burst(band(crack, 780, 2800))  # clack
    sound += amp(-16) * swelling(wall_hz, t60=.032, rise_s=.0015)
    sound += amp(-13) * ringing(SLAB_MODES)
    sound += amp(tick_db - 1) * edge_tick(crack, rest=0.45, tick_s=0.0028)
    sound += amp(ping_db - 2) * swelling(ping_hz, t60=.006, rise_s=.001)
    return sound + amp(-28.5) * thump + amp(-23) * burst(band(crack, 323, 520))


def slabs():
    """Clicks of the slabs in their slots, each a fresh contact."""
    out = np.zeros(N)
    for s, db, *timbre in SLABS:
        add(out, s - LEAD, amp(db) * click(*timbre))
    return out


def echoes(early_db, tail_db):
    """Quick reflections from counter and hands, then the tail of the shop."""
    hz, t, z = signal.stft(rng.standard_normal((2, SR // 2)), SR, nperseg=256)
    decay = np.exp(-np.log(1000) * t / read(ROOM, hz)[:, None])
    tail = signal.istft(z * decay, SR, nperseg=256)[1]
    t = np.arange(tail.shape[1]) / SR
    tail *= 1 - np.exp(-t / 0.00053)
    sparse = rng.standard_normal(tail.shape) * (rng.random(tail.shape) < .06)
    early = sparse * np.exp(-t / 0.0042) * (t > .001)
    fade = np.clip((.45 - t) / .1, 0, 1)
    early = amp(early_db) * early / np.linalg.norm(early[0])
    return fade * pair(early + amp(tail_db) * tail / np.linalg.norm(tail[0]))


def room(x, early_db, tail_db, count=3):
    """Changing echo paths: the sound passes round three sets of echoes, 2.3 times a second."""
    turn = 2 * np.pi * 2.3 * np.arange(N) / SR
    shares = np.maximum([np.cos(turn + 2 * np.pi * k / count) for k in range(count)], 0)
    shares /= np.linalg.norm(shares, axis=0)
    wet = np.zeros((2, N))
    for share in shares:
        wet += signal.oaconvolve((x * share)[None], echoes(early_db, tail_db), axes=1)[:, :N]
    return x + wet


def ports(x, balance):
    """Each port delays and colours some bands of the airborne sound more than the other."""
    size = next_fast_len(N + 4096)
    hz = np.fft.rfftfreq(size, 1 / SR)
    step = np.diff(np.interp(hz, *np.transpose(PORT_PHASE)), prepend=0)
    lag = np.cumsum(np.maximum([-step, step], 0), axis=1)  # only ever delays, never advances
    gain = amp(np.outer([.5, -.5], read(balance, hz)))
    gain /= np.sqrt(np.mean(gain ** 2, axis=0))
    return irfft(rfft(x, size) * gain * np.exp(-1j * lag), size)[:, :N]


def scene():
    """Box, slabs and sliding in still shop air; the port balance crossfades from far to near."""
    knocks = room(box() + chatter() + nips(), early_db=-6.5, tail_db=-15.0)
    clicks = room(band(slabs() + jostling() + rasping(), 100, 21000), early_db=-6.5, tail_db=-17.5)
    rubs = room(sliding() + turning(), early_db=-6, tail_db=-13) + squeak()
    airborne = knocks + clicks + rubs
    close = np.interp(np.arange(N) / SR, MOVE_IN_S, [0, 1])
    heard = ports(airborne * (1 - close), FAR_BALANCE) + ports(airborne * close, NEAR_BALANCE)
    return heard + handling() + air()


def record(dry):
    """The hardest peaks are rounded off; then a low-pass sets the band limit."""
    rounded = dry / (1 + (dry / .85) ** 4) ** .25
    low_pass = signal.firwin(255, BAND_LIMIT_HZ, window=("kaiser", 9), fs=SR)
    return signal.oaconvolve(rounded, low_pass[None], "same")


dry = scene()
out = record(dry)
bounce(out)
```